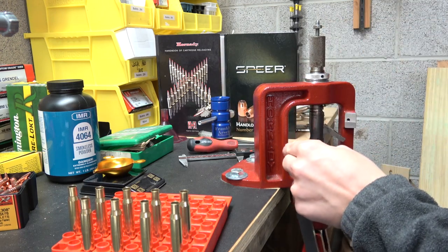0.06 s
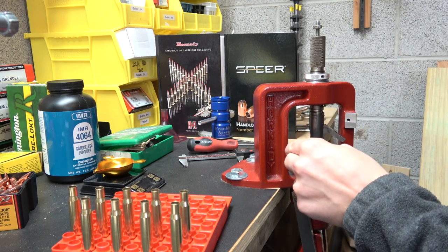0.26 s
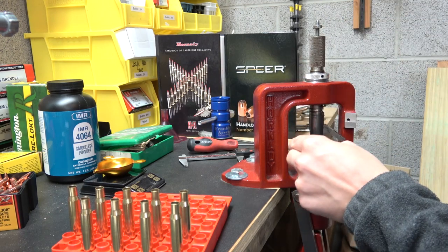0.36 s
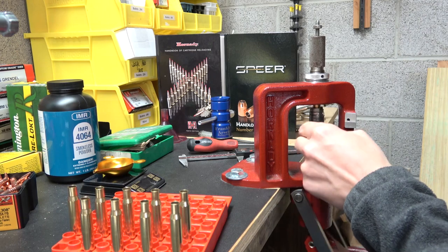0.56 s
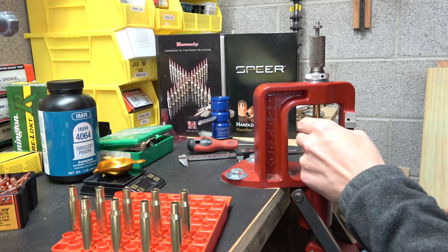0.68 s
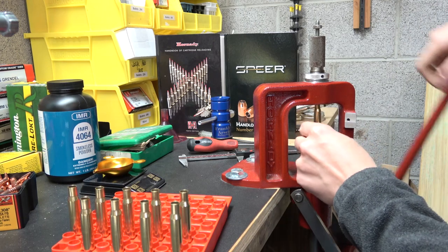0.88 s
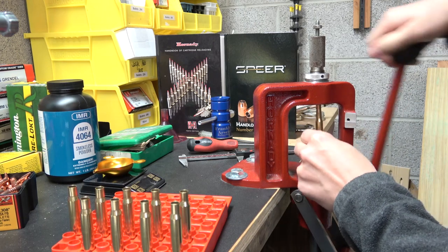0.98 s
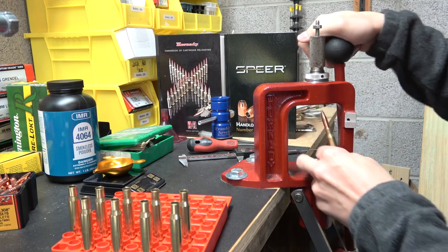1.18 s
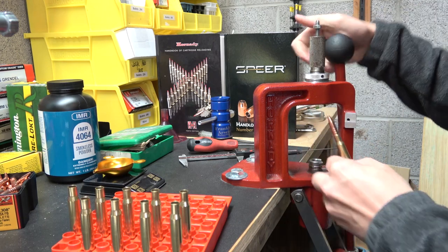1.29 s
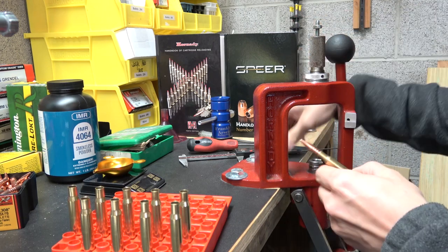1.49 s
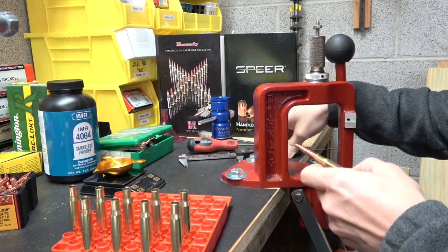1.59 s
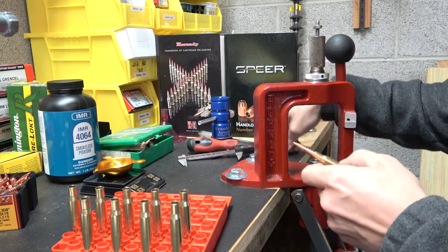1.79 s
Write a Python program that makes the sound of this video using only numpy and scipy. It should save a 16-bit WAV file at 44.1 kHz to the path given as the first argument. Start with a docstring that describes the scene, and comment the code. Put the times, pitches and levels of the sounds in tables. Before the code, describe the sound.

Close up in a small quiet workshop, a metal press slides and clunks, a brass case clicks and pops from its holder, the lever thumps back, then fingers stir loose bullets in a box.

```python
"""A hand lever press on a wooden workbench, close by in a small room. The ram slides up (rubbing noise) and
knocks at the top of its stroke (damped modes and noise bursts); loose bullets in a box jingle (ticks, grainy
noise, modes). The ram slides down, a brass cartridge scrapes, clinks and rings, then snaps out of its holder
(double crack, steel ring). The lever thuds home, the bullets jingle again and then once more as fingers pick
one out. A sleeve brushes (friction noise), soft nudges thud; room noise and low rocking run throughout."""
import sys
import numpy as np
from scipy import signal
from scipy.fft import rfft, irfft, next_fast_len
from scipy.io import wavfile
from scipy.ndimage import map_coordinates

SR = 44100
rng = np.random.default_rng(int(sys.argv[2]) if len(sys.argv) > 2 else 0)


def wav_record(signal):
    """Record a signal, one row per channel, as 16-bit PCM in the file named by sys.argv[1]."""
    frames = np.transpose(np.atleast_2d(signal))
    bounded = np.clip(frames, -1, 1)
    # unit amplitude maps onto the largest positive 16-bit level
    quanta = np.round(bounded * 32767).astype(np.int16)
    wavfile.write(sys.argv[1], SR, quanta)


N = 81585
T = np.arange(SR // 2) / SR  # time within one event, s
TIME_S = np.arange(N) / SR

# modes of press and bench: f/Hz, level with ram down/dB, level with ram up/dB, t60/s
BENCH_MODES = [(42.9, -7, -41, 0.47), (64, -15, 7.5, 0.15), (135.3, -9, -19, 0.28), (208, -9, -30, 0.29),
               (268.4, -18, -17, 0.29), (343, -3.5, -7, 0.12), (387.4, -3.5, 4.5, 0.079),
               (461.8, -3, -11.5, 0.14), (528.4, -16, -8, 0.26), (616, -4, -32, 0.088),
               (714.5, 1, -13.5, 0.097), (813, -3, 0.5, 0.056), (934, -8.5, -18, 0.068),
               (1005, -17.5, -18, 0.12), (1087, -20, -11.5, 0.12), (1183, -21, -11.5, 0.099),
               (1340, -11.5, -23, 0.076), (1520, -22, -41, 0.25), (1727, -22.5, -24.5, 0.19),
               (2004, -30, -29, 0.064), (2500, -17.5, -34, 0.12), (3015, -23, -44, 0.15)]
# metal contacts of cartridge, holder and linkage:
# t/s, level/dB, treble tilt above 2 kHz/(dB/octave), tick f/Hz, case ring level/dB, mouth ring level/dB
METAL_CONTACTS = [(0.2333, -19, -9, 1620, -82, -75), (0.248, -46, -1, 6800, -80, -76),
                  (.5115, -31.5, -2, 8750, -80, -67), (0.6156, -28.5, 1, 4970, -80, -51),
                  (0.6444, -23, 3, 9540, -75, -40), (.774, -43.5, 6, 5070, -88.5, -80.5),
                  (0.9388, -16.5, -2.5, 4600, -44, -50), (.968, -18, -2, 9000, -35, -46),
                  (0.9864, -16.5, -4.5, 9300, -37, -56), (1.002, -30, -1, 13000, -70, -60),
                  (1.015, -27, -11, 4200, -60, -68), (1.045, -14.5, -4, 4360, -58, -36),
                  (1.196, -21.5, 0, 4570, -79, -78), (1.1987, -14.5, -1, 4630, -68, -60),
                  (1.2024, -11, 6, 7780, -67, -68), (1.3255, -35, 10, 11060, -70, -80),
                  (1.349, -44, 2, 7860, -80, -76)]
# brass scrapes past steel and fingers: start/s, end/s, level/dB
BRASS_SCRAPES = [(0.472, 0.948, -56), (0.939, 0.981, -42), (0.983, 1.057, -41.5), (1.05, 1.126, -50.5),
                 (1.3, 1.382, -57.5)]
# colour of scraping brass: f/Hz, level/dB
SCRAPE_COLOUR = [(150, -1.5), (600, 0.5), (1100, 1), (1800, -2), (3000, -8.5), (4300, -11.5), (6000, -15),
                 (10000, -20), (15500, -25)]


def amp(db):
    """Decibels to gain."""
    return 10 ** (np.asarray(db) / 20)


def unit(x):
    """Scale to rms 1."""
    return x / np.sqrt(np.mean(x ** 2) + 1e-20)


def along(points, hz):
    """Interpolate (Hz, value) points on a log frequency axis."""
    f, v = np.transpose(points)
    return np.interp(np.log(hz + 1), np.log(f + 1), v)


def freqs(size):
    """Frequency grid of a signal, Hz."""
    return np.fft.rfftfreq(size, 1 / SR)


def fade(t60_s):
    """Exponential decay, -60 dB at t60."""
    return amp(-60 * T / t60_s)


def rise(time_constant_s):
    """Soft exponential attack."""
    return 1 - np.exp(-T / time_constant_s)


def add(out, start_s, x):
    """Mix x into out from start_s."""
    i = max(0, round(start_s * SR))
    out[i:i + len(x)] += x[:max(0, N - i)]


def wander(size, t, rate_hz):
    """Random curve through normal values drawn at rate_hz."""
    return map_coordinates(rng.standard_normal(size), [t * rate_hz], mode="wrap")


def noise(gain, size):
    """Noise of rms 1 with the given gain per frequency."""
    return unit(irfft(rfft(rng.standard_normal(size)) * gain, size))


def steady(colour):
    """Coloured noise that lasts throughout."""
    return noise(amp(along(colour, freqs(2 * N))), size=2 * N)[:N]


def burst(colour_db, t60s):
    """Noise that starts at rms 1 and decays with a t60 per frequency band."""
    hz = freqs(len(T))
    spectrum = rfft(noise(amp(colour_db), len(T)))
    centres_hz, times_s = np.transpose(t60s)
    out = np.zeros(len(T))
    for weights, t60_s in zip(np.eye(len(times_s)), times_s):
        band = irfft(spectrum * along(np.c_[centres_hz, weights], hz))
        out += band * fade(t60_s)
    return out


def crack(colour_db):
    """Minimum-phase pulse of peak 1: the folded cepstrum puts its energy at the onset."""
    cepstrum = irfft(np.log(amp(colour_db)))
    half = len(cepstrum) // 2
    cepstrum[1:half] *= 2
    cepstrum[half:] = 0
    pulse = irfft(np.exp(rfft(cepstrum)))
    return pulse / abs(pulse).max()


def resonance(hz, centre_hz, width_hz):
    """Gain of one damped resonator, 1 at its centre."""
    return abs(hz * width_hz / (centre_hz * centre_hz - hz * hz + 1j * hz * width_hz))


def ring(modes, scatter_db):
    """Damped sines of alternating sign, levels scattered at each blow."""
    out = np.zeros(len(T))
    for k, (hz, db, t60_s) in enumerate(modes):
        gain = amp(db + scatter_db * rng.standard_normal())
        out += (-1) ** k * gain * fade(t60_s) * np.sin(2 * np.pi * hz * T)
    return out


def rub(strokes, colour, edge_s, grain_db, grain_hz):
    """Friction noise whose level catches unevenly during each stroke."""
    level = np.zeros(N)
    for start_s, end_s, db in strokes:
        inside_s = np.minimum(TIME_S - start_s, end_s - TIME_S)
        level += amp(db) * np.clip(inside_s / edge_s + .5, 0, 1)
    catches = amp(grain_db * wander(N // 4, TIME_S, grain_hz))
    return level * unit(steady(colour) * catches)


def knocks():
    """The linkage hits its stops: press and bench modes ring, joints clatter, the bench top thumps."""
    # linkage knocks: t/s, mode level/dB, ram height/(0-1), clatter level/dB, thump level/dB
    blows = [(0.2328, -21, 0.87, -29.5, -28), (0.2391, -23.5, 0.93, -33, -35.5), (.279, -54, 0.8, -43, -42),
             (0.328, -47.5, 0.23, -53, -44), (0.374, -52.5, 0.2, -59, -63.5), (.607, -67, 0, -35, -54),
             (.619, -39.5, 0, -53, -37), (.645, -54, 0, -44, -59), (0.9376, -58, 0.3, -46, -72),
             (1.045, -40, 0, -46.5, -68), (1.2018, -13.5, 0.09, -20.5, -25.5),
             (1.2196, -28, 0.5, -26, -21.5), (1.266, -37, 0.16, -31.5, -32), (1.287, -56, 0.2, -37, -33),
             (1.376, -43.5, 0, -43.5, -42), (1.394, -50, 0.65, -67, -37.5)]
    # joint clatter colour: f/Hz, level/dB
    clatter_colour = [(100, -6.5), (400, 3.5), (900, 0), (1500, -4.5), (2600, -13), (4000, -20),
                      (6000, -35), (15000, -31)]
    # joint clatter decay: f/Hz, t60/s
    clatter_t60s = [(300, 0.21), (1500, 0.14), (3000, 0.15), (10000, 0.18)]
    # bench-top thump colour: f/Hz, level/dB
    thump_colour = [(15, -23), (45, 4), (75, -1), (130, -12), (300, -13.5), (700, -38), (2000, -49)]
    # bench-top thump decay: f/Hz, t60/s
    thump_t60s = [(50, 0.23), (400, 0.25)]
    up_tilt_db_per_octave, tilt_from_hz = -1.5, 920  # joints sound duller with the ram up
    bench_rise_s, thump_rise_s, clatter_rise_s = 0.0021, 0.0022, 0.00023

    out, hz = np.zeros(N), freqs(len(T))
    tilt_db = up_tilt_db_per_octave * np.log2(np.maximum(hz / tilt_from_hz, 1))
    for s, db, height, clatter_db, thump_db in blows:
        up = np.clip(height, 0, 1)
        modes = [(f, down_db + up * (up_db - down_db), t60_s) for f, down_db, up_db, t60_s in BENCH_MODES]
        clatter = burst(along(clatter_colour, hz) + up * tilt_db, clatter_t60s)
        thump = burst(along(thump_colour, hz), thump_t60s)
        add(out, s, amp(db) * ring(modes, scatter_db=2) * rise(bench_rise_s))
        add(out, s, amp(clatter_db) * clatter * rise(clatter_rise_s))
        add(out, s, amp(thump_db) * thump * rise(thump_rise_s))
    return out


def snaps():
    """The cartridge snaps free: a hard double contact, a short steel ring and the room's answer."""
    # cartridge leaves the holder: t/s, crack peak/dB, holder ring level/dB
    releases = [(1.091, 0.5, -22), (1.1225, -36, -39)]
    # snap colour: f/Hz, level/dB
    snap_colour = [(300, -35), (2500, -28), (5500, -17.5), (7700, 2), (8700, -8), (9900, 3.5), (10900, 2.5),
                   (11700, -10), (12500, 0), (14000, -3.5), (15200, -18), (17000, -21)]
    # steel holder modes: f/Hz, level/dB, t60/s
    holder_modes = [(3585, 1.5, 0.037), (9340, -5, 0.019), (10440, -23, .025), (12600, -11, 0.026)]
    # room answer colour: f/Hz, level/dB
    room_colour = [(200, 0), (450, 0), (650, 7), (900, 12), (1500, -2.5), (3000, -10), (5500, -16),
                   (7500, -7.5), (10000, -6.5), (14000, -5.5), (16000, -14)]
    # room answer decay: f/Hz, t60/s
    room_t60s = [(800, 0.16), (4000, 0.22), (12000, 0.13)]
    rebound_s, rebound_db = 0.00033, -13
    sizzle_db, sizzle_t60_s, room_db = -18.5, 0.018, -30.5

    out, hz = np.zeros(N), freqs(len(T))
    colour_db = along(snap_colour, hz)
    for s, db, ring_db in releases:
        sizzle = amp(sizzle_db) * noise(amp(colour_db), len(T)) * fade(sizzle_t60_s)
        room = amp(room_db) * burst(along(room_colour, hz), room_t60s) * rise(0.00035)
        holder = amp(ring_db) * ring(holder_modes, scatter_db=-0.5)
        add(out, s, amp(db) * (crack(colour_db) + sizzle + room) + holder)
        add(out, s + rebound_s, amp(db + rebound_db) * crack(colour_db))
    return out


def clicks():
    """Light metal contacts: crack, narrow-band tick, chatter, tail and the rough ring of the case mouth."""
    # contact colour: f/Hz, level/dB
    click_colour = [(300, -14), (1500, -8), (3200, -8), (4500, -4.5), (5800, -10.5), (9500, -7),
                    (11000, -9.5), (12700, -13), (14000, -14), (16500, -37), (20000, -65)]
    # contact tail decay: f/Hz, t60/s
    tail_t60s = [(1000, 0.081), (4000, 0.094), (12000, 0.037)]
    crack_db, tail_db = -22, -23
    chatter_db, chatter_t60_s = -13, 0.011
    tick_db, tick_width_hz, tick_t60_s = -15.5, 670, 0.02
    mouth_hz, mouth_width_hz, mouth_t60_s = 12700, 660, 0.05

    out, hz = np.zeros(N), freqs(len(T))
    for s, db, tilt, tick_hz, _, mouth_db in METAL_CONTACTS:
        colour_db = along(click_colour, hz) + tilt * np.log2(np.maximum(hz, 2000))
        mouth = noise(resonance(hz, mouth_hz, mouth_width_hz) ** 2, len(T)) * fade(mouth_t60_s)
        tick = amp(tick_db) * noise(resonance(hz, tick_hz, tick_width_hz) ** 2, len(T)) * fade(tick_t60_s)
        chatter = amp(chatter_db) * noise(amp(colour_db), len(T)) * fade(chatter_t60_s)
        tail = amp(tail_db) * burst(colour_db, tail_t60s)
        contact = amp(crack_db) * crack(colour_db) + tick + chatter + tail
        add(out, s, amp(db) * contact + amp(mouth_db) * mouth)
    return out


def case_ring():
    """Contacts set the brass case's modes ringing, with wavering phase, until fingers damp them."""
    # brass case modes: f/Hz, level/dB, t60/s
    case_modes = [(7320, 1, 0.07), (9000, -11, 0.11)]
    grip_s, grip_db, grip_time_s = 1.02, -18, .003  # fingers close on the case
    sing_s, sing_db, sing_t60_s = 0.99, -39, 0.14  # sliding in the holder keeps the lowest mode singing
    waver_rad, waver_hz = 0.65, 240

    out = np.zeros(N)
    grip = amp(grip_db * np.clip((TIME_S - grip_s) / grip_time_s, 0, 1))
    sing_rise = np.clip((TIME_S - sing_s) / (grip_s - sing_s), 0, 1)
    sing_decay = amp(-60 * np.maximum(TIME_S - grip_s, 0) / sing_t60_s)
    for k, (mode_hz, mode_db, t60_s) in enumerate(case_modes):
        swing = np.zeros(N)
        for s, *_, case_db, _ in METAL_CONTACTS:
            add(swing, s, amp(case_db + mode_db) * fade(t60_s))
        if k == 0:
            swing += amp(sing_db) * sing_rise * sing_decay
        waver = waver_rad * wander(N // 4, TIME_S, waver_hz)
        out += swing * grip * np.sin(2 * np.pi * mode_hz * TIME_S + waver)
    return out


def bullets():
    """Loose bullets touch: a sharp tick, a grainy spray through the heap's resonances, a few ringing modes."""
    # touches: t/s, level/dB, treble tilt/(dB/octave)
    touches = [(0.2559, -39.5, -7), (0.2704, -42, -5), (0.282, -56, -6), (0.29, -53, -6), (0.301, -60, -6),
               (1.22, -36, -1), (1.238, -43.5, -3), (1.253, -41.5, -2), (1.265, -46.5, 3), (1.574, -47, -8),
               (1.5807, -33.5, -3), (1.585, -32, 7), (1.5983, -35.5, -2), (1.613, -45, -1),
               (1.6525, -49, 3), (1.6623, -32, 14), (1.674, -34.5, 8), (1.6902, -34.5, 2),
               (1.7024, -38, -3), (1.715, -40.5, 3), (1.7262, -42.5, -5), (1.8091, -43, -9),
               (1.8364, -41, -1), (1.845, -40.5, -8)]
    # resonances of bullets in their box: f/Hz, width/Hz, level/dB
    heap_resonances = [(1720, 390, -8.5), (3900, 1400, -11), (5640, 580, -7.5), (6620, 390, -4),
                       (8000, 1300, -8), (9540, 280, 4.5), (10520, 540, 2), (10840, 230, -9),
                       (12300, 310, -1), (13400, 770, -5), (15300, 450, -3)]
    # longest ringing bullets: f/Hz, level/dB
    bullet_modes = [(6750, -4), (9350, -7), (9730, -5), (9965, -2), (10240, -6), (10490, -0.5), (10590, -9),
                    (11080, 1), (12745, -12), (12815, -0.5), (14280, -3)]
    rise_s, t60_s, tail_db, tail_t60_s = 0.00043, 0.031, -18.5, 0.27
    grain_db, grain_hz = 2.8, 1130
    ring_db, ring_t60_s = -13, 0.081
    crack_db = 4.5  # over the spray
    detune, scatter_db = 0.02, 1  # each touch meets different bullets
    tilt_from_hz = 10500

    def octaves(f):
        """Octaves above the tilt corner."""
        return np.log2(np.maximum(f / tilt_from_hz, 1))

    out, hz = np.zeros(N), freqs(len(T))
    shape = rise(rise_s) * (fade(t60_s) + amp(tail_db) * fade(tail_t60_s))
    for s, db, tilt in touches:
        power = np.zeros(len(hz))
        for centre_hz, width_hz, level_db in heap_resonances:
            gain = amp(level_db + scatter_db * rng.standard_normal())
            tuned_hz = centre_hz * (1 + detune * rng.standard_normal())
            power += (gain * resonance(hz, tuned_hz, width_hz)) ** 2
        body = np.sqrt(power)
        tilt_db = tilt * octaves(hz)
        grains = amp(grain_db * wander(len(T) // 10, T, grain_hz))
        spray = unit(noise(body * amp(tilt_db), len(T)) * grains) * shape
        tick = amp(crack_db) * crack(20 * np.log10(body + 1e-4) + tilt_db)
        modes = [(f, level_db + tilt * octaves(f), ring_t60_s) for f, level_db in bullet_modes]
        add(out, s, amp(db) * (tick + spray + amp(ring_db) * ring(modes, scatter_db=-0.5)))
    return out


def ram_slides():
    """The ram rubs in its bore: friction noise, its colour shifted in frequency per stroke."""
    # ram strokes: start/s, end/s, level/dB, frequency factor
    strokes = [(0, 0.197, -44, 0.92), (0.462, 0.534, -42.5, 1.33), (0.58, 0.658, -43.5, 0.8),
               (0.703, 0.894, -56, 0.43)]
    # ram friction colour: f/Hz, level/dB
    slide_colour = [(100, -12), (300, -3), (520, 1), (750, -2), (1200, -9.5), (1900, -24), (4000, -33.5),
                    (15000, -53)]
    out = np.zeros(N)
    for start_s, end_s, db, factor in strokes:
        colour = np.array(slide_colour) * [factor, 1]
        out += rub([(start_s, end_s, db)], colour, edge_s=0.08, grain_db=-1.0, grain_hz=151.7)
    return out


def scrapes():
    """Brass scrapes past steel and fingers: unevenly catching friction noise."""
    return rub(BRASS_SCRAPES, SCRAPE_COLOUR, edge_s=0.018, grain_db=2.0, grain_hz=213.2)


def grit():
    """The scraping brass catches and lets go in tiny irregular ticks."""
    ticks_per_s, level_db, t60_s, scatter_db = 170, -6, 0.0084, 4.5
    out = np.zeros(N)
    colour = amp(along(SCRAPE_COLOUR, freqs(len(T))))
    ticks = [noise(colour, len(T)) * fade(t60_s) for _ in range(8)]
    gaps, strengths = rng.random((2, 600))
    times_s = np.cumsum(2 * gaps) / ticks_per_s
    boosts_db = -scatter_db * np.log(1 - .95 * strengths)  # many weak catches, few strong
    for k, s in enumerate(times_s):
        for start_s, end_s, db in BRASS_SCRAPES:
            if start_s <= s < end_s:
                add(out, s, amp(db + level_db + boosts_db[k]) * ticks[k % len(ticks)])
    return out


def bumps():
    """Hands and lever nudge the bench: dull narrow-band thuds that barely wake its modes."""
    # soft nudges: t/s, level/dB, thud f/Hz
    nudges = [(0.588, -35.5, 222), (.612, -33.5, 127.7), (0.626, -44, 145), (1.44, -48, 119),
              (1.503, -42, 64), (1.581, -44, 132), (1.628, -40, 120.6), (1.675, -49, 114.5)]
    t60_s, rise_s, knock_db, relative_width = 0.16, 0.0041, -13.5, 0.15
    out, hz = np.zeros(N), freqs(len(T))
    modes = [(f, down_db, mode_t60_s) for f, down_db, _, mode_t60_s in BENCH_MODES]
    for s, db, thud_hz in nudges:
        thud = noise(resonance(hz, thud_hz, relative_width * thud_hz) ** 2, len(T)) * fade(t60_s)
        knock = amp(knock_db) * ring(modes, scatter_db=7)
        add(out, s, amp(db) * rise(rise_s) * (thud + knock))
    return out


def sleeve():
    """Cloth brushes: bright friction noise with a coarse grain."""
    # cloth strokes: start/s, end/s, level/dB
    brushes = [(.5, .92, -63.5), (1.32, 1.45, -57), (1.45, 1.56, -65.5)]
    # cloth colour: f/Hz, level/dB
    cloth_colour = [(500, -26), (3000, -16), (7000, -3), (13500, 5.5), (16000, -1)]
    return rub(brushes, cloth_colour, edge_s=0.031, grain_db=2.5, grain_hz=377)


def bench_sway():
    """The bench rocks: very low noise with a drawn level curve."""
    # rocking colour: f/Hz, level/dB
    sway_colour = [(5, -4.5), (12, 0), (25, -19.5), (45, -22.5), (90, -42.5), (200, -56), (600, -100)]
    # rocking level: t/s, level/dB
    sway_level = [(0, -39.5), (.2, -38), (.3, -28), (.55, -29), (0.801, -32), (1.1, -36), (1.4, -41),
                  (1.52, -23.5), (1.62, -38), (1.85, -40.5)]
    return amp(np.interp(TIME_S, *np.transpose(sway_level))) * steady(sway_colour)


def room_noise():
    """Quiet steady coloured noise of the room."""
    # room noise colour: f/Hz, level/dB
    floor_colour = [(30, 2), (120, -4.5), (250, -5), (380, -16.5), (600, -8), (800, -20.5), (2500, -25.5),
                    (6000, -30.5), (15000, -31)]
    return amp(-54.5) * steady(floor_colour)


def scene():
    """Everything at one close microphone."""
    press = knocks() + ram_slides() + bumps()
    cartridge = snaps() + clicks() + case_ring() + scrapes() + grit()
    surroundings = sleeve() + bench_sway() + room_noise()
    return (press + cartridge + bullets() + surroundings)[None]


def record(dry):
    """The recorder keeps nothing above its band limit."""
    top_hz = 15900
    size = next_fast_len(N + SR // 2)
    return irfft(rfft(dry, size) * (freqs(size) < top_hz), size)[:, :N]


dry = scene()
out = record(dry)
wav_record(out)
```